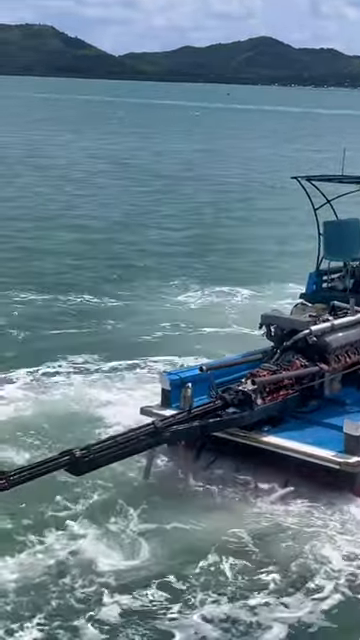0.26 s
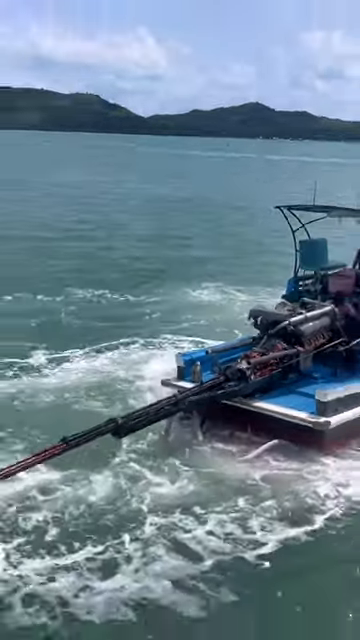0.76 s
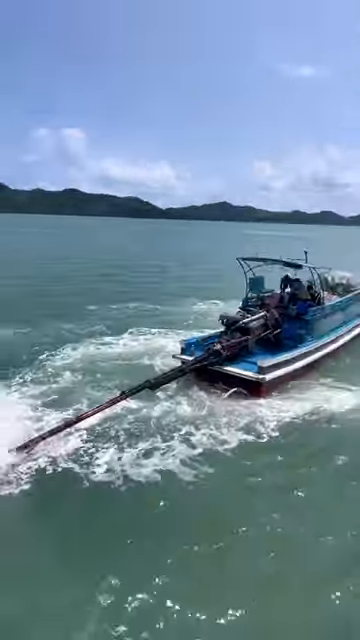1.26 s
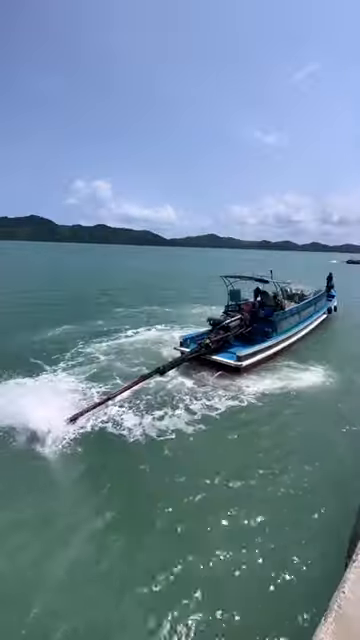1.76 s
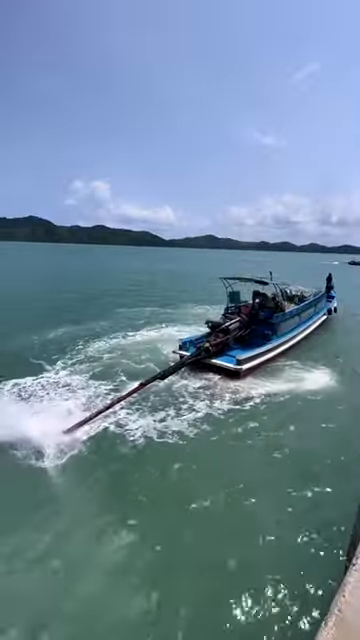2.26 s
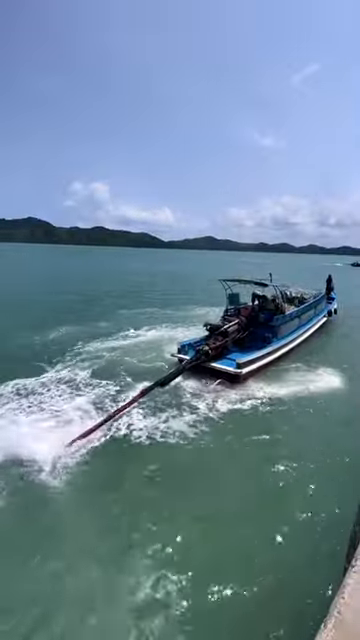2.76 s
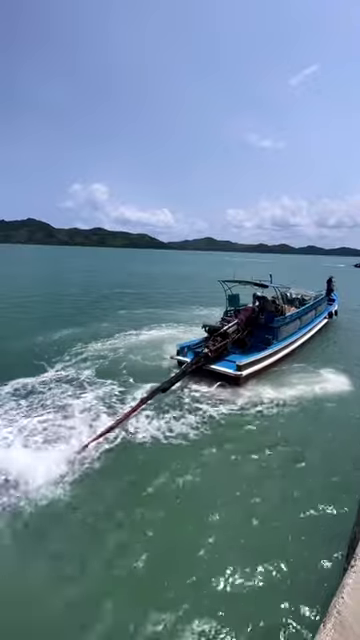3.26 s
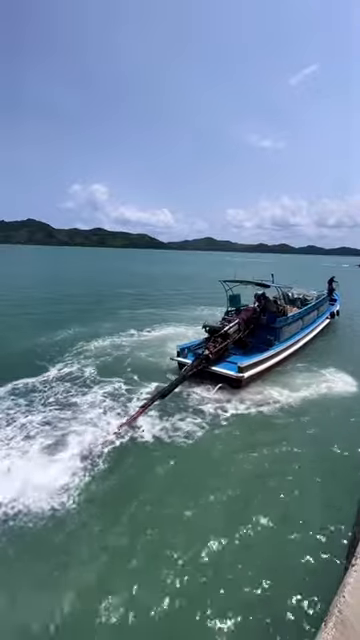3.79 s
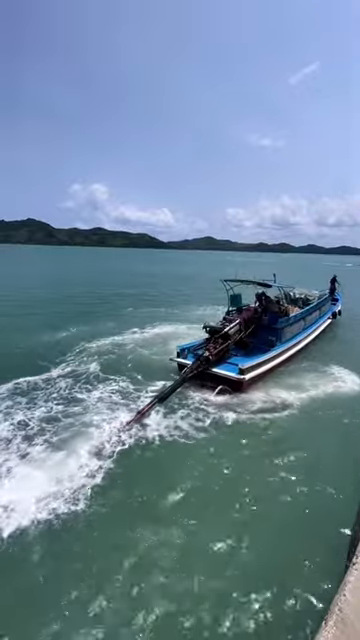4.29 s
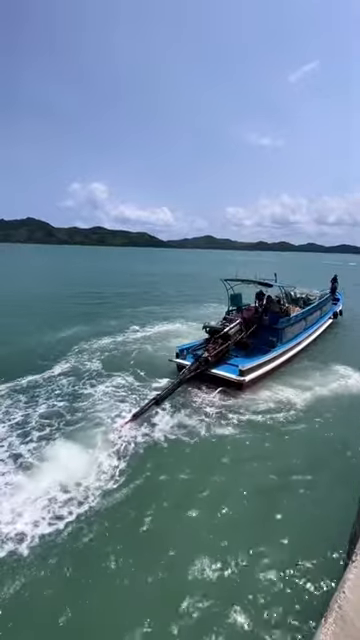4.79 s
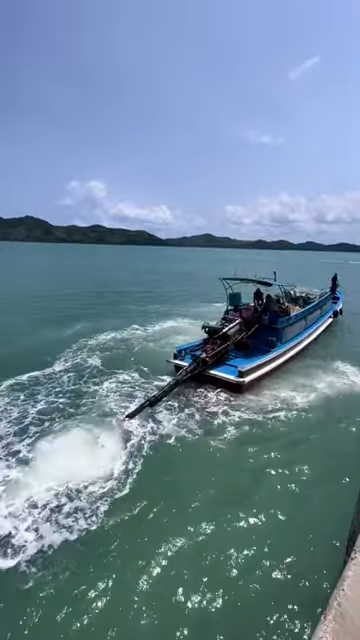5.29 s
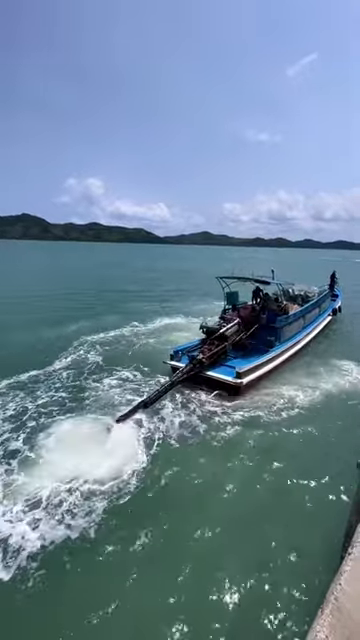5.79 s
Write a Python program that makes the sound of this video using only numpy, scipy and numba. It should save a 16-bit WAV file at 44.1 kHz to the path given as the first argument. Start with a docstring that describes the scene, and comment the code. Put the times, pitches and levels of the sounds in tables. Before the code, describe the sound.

A large diesel with open exhaust drives a wooden boat across open water. It cruises with a rough, uneven growl and metallic clatter, slows to a quieter lumpy idle around three seconds, then revs abruptly with barking exhaust and hard cracks. The propeller digs in with a low thrum, the engine eases, and a second rev climbs to the end. Spray hisses beneath; outdoors, handheld stereo microphone on the shore, no echo.

```python
"""Diesel long-tail boat across water

A big eight-cylinder engine cruises, drops to idle and is revved twice. Uneven firings excite low engine orders
(sines locked to the cycle) and resonant open pipes; gas noise rasps once a firing. Valve gear knocks and cracks
through casing resonances, foam and spray are droplet-modulated noise, and a propeller later digs in and thrums."""
import sys
import numpy as np
from scipy import signal
from scipy.fft import rfft, irfft, next_fast_len
from scipy.io import wavfile
from scipy.ndimage import uniform_filter1d
from numba import njit

SR = 44100
rng = np.random.default_rng(int(sys.argv[2]) if len(sys.argv) > 2 else 0)


def materialize(psi):
    """Save the field psi as 16-bit PCM at rate SR to the path in sys.argv[1].

    A 1-D psi becomes a single channel; in a 2-D psi each row is a channel.
    """
    bounded = np.clip(np.atleast_2d(psi).T, -1, 1)
    quanta = np.round(bounded * 32767).astype(np.int16)
    wavfile.write(sys.argv[1], SR, quanta)


N = 266364
TIME_S = np.arange(N) / SR


def undb(db):
    """Decibel definition: amplitude ratio of a level."""
    return 10 ** (np.asarray(db) / 20)


def unit(x):
    """Normalisation to a root-mean-square of 1."""
    return x / np.sqrt(np.mean(x ** 2))


def curves(table):
    """Linear interpolation of a table's columns over its times, one value a sample."""
    s, *columns = np.transpose(table)
    return [np.interp(TIME_S, s, column) for column in columns]


def glide(start_db, end_db, middle_s):
    """Linear level change lasting 1 s about its middle."""
    return np.interp(TIME_S, [middle_s - .5, middle_s + .5], [start_db, end_db])


def walk(rate):
    """Smoothed random process: levels held 1 / rate s and averaged twice; spread near 1."""
    hold = int(SR / rate)
    steps = np.repeat(rng.standard_normal(N // hold + 1), hold)
    return 1.13 * uniform_filter1d(uniform_filter1d(steps, hold), hold)[:N]


def noise_pair(alike):
    """Partial coherence: left and right noise share the given part as a common centre."""
    mid, side = rng.standard_normal((2, N))
    alike = np.clip(alike, 0, 1)
    return np.sqrt(1 + alike) * mid + np.sqrt(1 - alike) * side * np.array([[1], [-1]])


@njit
def svf(x, hz, width):
    """Second-order resonance: a state-variable band-pass with gain 1 at the centre."""
    y, band, low = np.empty(len(x)), 0., 0.
    g, damping = np.tan(np.pi * hz / SR), width / hz
    for i in range(len(x)):
        v = (band + g * (x[i] - low)) / (1 + g * (g + damping))
        band, low, y[i] = 2 * v - band, low + 2 * g * v, damping * v
    return y


def ring(pair, modes, flicker_db):
    """Modal superposition: steep resonances of a left-right pair, each wavering in level by itself."""
    out = np.zeros((2, N))
    for k, (hz, width, *db) in enumerate(modes):
        waver_db = flicker_db * walk(11)
        for ear in range(2):
            once = svf(pair[ear], 1. * hz, 1.66 * width)
            twice = svf(once, 1. * hz, 1.66 * width)  # a second pass steepens the skirts
            out[ear] += (-1) ** k * undb(db[ear] + waver_db) * twice
    return unit(out)


def narrow_modes(pair, ring_db, sharpness=65):
    """Modal density: many narrow modes, flaring and fading at random, colour the noise."""
    out = pair.copy()
    for hz in 550 * 2 ** (3.2 * (np.arange(36) + rng.random(36)) / 36):
        flare = undb(ring_db + 4.5 * walk(9))
        out += flare * np.array([svf(ear, hz, hz / sharpness) for ear in pair])
    return out


def widen(pair, width_db):
    """Mid-side stereo: trades the centre of a left-right pair against its sides."""
    mid = (pair[0] + pair[1]) / 2 * undb(-width_db / 2)
    side = (pair[0] - pair[1]) / 2 * undb(width_db / 2)
    return np.array([mid + side, mid - side])


def hollow(pair):
    """Band rejection: takes bands out of the centre of a left-right pair for short spells."""
    # spells: start t/s, end t/s, low f/Hz, high f/Hz
    hollows = [(2.906, 3.166, 260, 1026), (2.911, 2.957, 960, 1360), (3.18, 3.406, 1020, 1370),
               (3.286, 3.48, 390, 640), (3.29, 3.334, 640, 780), (3.42, 3.497, 640, 970),
               (3.556, 3.663, 470, 690), (5.454, 5.541, 530, 1390)]
    edge_s = 0.039
    size = next_fast_len(N)
    centre = rfft(pair.mean(axis=0), size)
    hz = np.linspace(0, SR / 2, size // 2 + 1)
    removed = 0
    for start_s, end_s, low_hz, high_hz in hollows:
        gate = np.clip(np.minimum(TIME_S - start_s, end_s - TIME_S) / edge_s + .5, 0, 1)
        removed = removed + gate * irfft(centre * ((hz >= low_hz) & (hz < high_hz)), size)[:N]
    return pair - removed


def drops():
    """Amplitude modulation by dense droplets, each a few ms long, some stronger than the rest."""
    hold = SR // 500  # samples; 500 droplets a second
    spread_db, top_db, share = 4, 11, .7
    size = undb(np.minimum(spread_db * rng.exponential(size=N // hold + 1), top_db))
    return 1 + share * unit(uniform_filter1d(np.repeat(size, hold), hold)[:N])


def wash():
    """Filtered noise: foam fizzes round the hull."""
    # bands: centre f/Hz, width/Hz, relative level left/dB, right/dB
    foam_bands = [(1280, 850, 6.5, 8), (3720, 530, -12, -17), (13000, 1900, -15, -8)]
    return ring(drops() * noise_pair(.6), foam_bands, flicker_db=2) * undb(-53)


def spray(knock, casing_db):
    """Modulated noise: steady hiss of spray, stirred by the engine knocks and following the clatter level."""
    # bands: centre f/Hz, width/Hz, relative level left/dB, right/dB
    spray_bands = [(7080, 1600, 5, 4.5), (9180, 1460, -7.5, -2.5), (12400, 2100, -2.5, -2),
                   (15000, 1100, -11, -21)]
    spray_db = -2 + 1.112 * casing_db
    hiss = (knock + 2.6) * drops() * noise_pair(0.39)
    return ring(hiss, spray_bands, flicker_db=2.0) * undb(spray_db)


def churn(pipe_db):
    """Turbulence through resonances: the propeller sinks deeper and thrums."""
    # resonances: centre f/Hz, width/Hz, relative level left/dB, right/dB
    churn_modes = [(185, 40, 0, 0), (247, 35, 0, 0)]
    digs_in_s, rise_s, below_pipe_db = 4.25, 0.056, -8.5
    sunk = np.clip((TIME_S - digs_in_s) / rise_s, 0, 1)
    return sunk * ring(noise_pair(0.76), churn_modes, flicker_db=2.0) * undb(pipe_db + below_pipe_db)


def knocks(casing_db, cylinder, place, chance_db):
    """Cyclic impulse excitation: each firing starts a decaying knock of the valve gear."""
    # one row: knock level/dB at each of the eight firings of a cycle
    firing_knock_db = np.array([12.5, 10, 8.5, 8.5, 8, 8, 5, 4])
    # clatter levels at which the knocks are all alike, and fully unlike
    even_db, uneven_db = -44, -34
    uneven = np.interp(casing_db, [even_db, uneven_db], [0, 1])
    mean_db = np.mean(firing_knock_db)
    knock_db = mean_db + uneven * (firing_knock_db[cylinder] - mean_db)
    return uniform_filter1d(undb(knock_db + chance_db) * np.exp(-place / 0.9), size=160)


def clatter(knock, casing_db, pan_db):
    """Structure-borne sound: valve-gear knocks excite the block and the casing."""
    # upper resonances: centre f/Hz, width/Hz, relative level left/dB, right/dB
    casing_modes = [(2515, 197, -3.5, -2.5), (3017, 524, -5, -5), (4250, 1120, -12, -10),
                    (5200, 800, -9, -8)]
    # lowest ring of the block: centre f/Hz, width/Hz, relative level left/dB, right/dB
    block_modes = [(1901, 300, 3.4, 0)]
    struck = narrow_modes((knock + 1.5) * drops() * noise_pair(0.78), ring_db=-4.5)
    upper = ring(struck, casing_modes, flicker_db=2.1) * undb(casing_db + 0.11 * pan_db - 1.5)
    # the ring near 1.9 kHz sinks by half a decibel around 4 s
    block_db = glide(-1.5, -2, middle_s=3.97)
    return upper - ring(struck, block_modes, flicker_db=1.5) * undb(casing_db + block_db)


def cracks():
    """Transient excitation: the hardest valve-gear knocks are bright bursts, each ringing at its own pitch."""
    # bursts: onset t/s, level before the common offset/dB, centre f/Hz
    hard_knocks = [(0.6833, -30, 4820), (0.698, -21, 5270), (0.7721, -24, 5150), (1.1398, -35, 3330),
                   (1.354, -24, 5010), (1.4975, -23, 5130), (1.7828, -24.5, 5760), (1.8572, -26, 5080),
                   (3.8137, -23.5, 5120), (0.463, -34, 4500), (3.858, -33, 3050), (3.8691, -13.5, 3140),
                   (3.916, -14, 2980), (3.927, -10.5, 2970), (3.9524, -30, 3150), (4.0193, -21, 3450),
                   (4.0402, -25, 3110), (4.0602, -13.5, 3210), (4.0796, -20, 3590), (4.1032, -19, 3310),
                   (4.156, -18, 3010), (4.183, -17, 3000), (4.193, -15, 3100), (4.2462, -22, 3010),
                   (4.2632, -19, 3000), (4.3211, -23, 3290), (4.4613, -27, 3020), (4.4887, -20.5, 5280),
                   (4.676, -16.5, 3070), (4.7511, -21.5, 3080), (4.8239, -21, 5330), (4.903, -22, 5110),
                   (4.9781, -21.5, 5445), (5.0629, -26, 5540), (5.3273, -24, 5320), (5.4789, -22, 6920),
                   (5.5169, -18.5, 5190), (5.5593, -17, 3430), (5.5797, -15, 6960), (5.648, -11.5, 5380),
                   (5.658, -13, 3090), (5.7139, -20, 5530), (5.716, -12.5, 3600), (5.7333, -8, 3640),
                   (5.7608, -8.5, 4380), (5.7907, -14, 3660), (5.8028, -6.5, 8700), (5.8361, -15, 3040),
                   (5.859, -9, 3740), (5.925, -7, 3440), (5.9643, -9.5, 3270), (5.986, -14, 3320),
                   (6.0117, -10, 5600)]
    # broad bands: centre f/Hz, width/Hz, relative level left/dB, right/dB
    crack_bands = [(2000, 1600, -14, -14), (4900, 5700, -5.5, -1.5), (7940, 4600, 2.5, 3),
                   (12800, 1800, -3, -2)]
    rise_s, fall_s, offset_db, ring_db = .002, .0055, -7.5, -0.5
    bright = ring(noise_pair(.4), crack_bands, flicker_db=1)
    hiss, shape, rung = noise_pair(1.0), np.zeros(N), np.zeros((2, N))
    t = np.arange(int(SR / 20)) / SR
    envelope = (1 - np.exp(-t / rise_s)) * np.exp(-t / fall_s)
    for s, db, hz in hard_knocks:
        i = int(s * SR)
        span = slice(i, i + len(t))
        burst = undb(db + offset_db) * envelope[:N - i]
        shape[span] += burst
        rung[:, span] += burst * unit(np.array([svf(ear[span], 1. * hz, hz / 3) for ear in hiss]))
    return shape * bright + undb(ring_db) * rung


def firings(cycles, scatter_db):
    """Periodic impulse train: a pulse per firing for each bank of four, uneven by cylinder and by chance."""
    # one row: strength/dB of each of the eight firings of a cycle
    cylinder_db = np.array([9, -24, 11, -25, 6.5, 12, -3.5, 8.5])
    count, place = np.divmod(8 * cycles, 1)  # firing number and place within it
    count = count.astype(int)
    cylinder = count % 8
    chance_db = scatter_db * rng.standard_normal(1000)[count]
    pulses = np.diff(count, prepend=count[0]) * undb(cylinder_db[cylinder] + chance_db)
    far_bank = np.isin(cylinder, (1, 2, 4, 7))
    return unit(pulses * ~far_bank), unit(pulses * far_bank), cylinder, place, chance_db


def rasp(gas, bark_db, pan_db):
    """Resonant jet noise: the rasp follows the bark level and sinks over a second."""
    # resonance: centre f/Hz, width/Hz, relative level left/dB, right/dB
    rasp_modes = [(666, 146, 1, 0)]
    rasp_db = 1.298 * bark_db + glide(3.5, -4.5, middle_s=1.96)
    return ring(gas, rasp_modes, flicker_db=3) * undb(rasp_db + .5 * pan_db)


def bark(gas, bark_db, pan_db):
    """Resonant jet noise: gas barks in the upper pipe modes."""
    # resonances: centre f/Hz, width/Hz, relative level left/dB, right/dB
    bark_modes = [(766, 99, -2, 10), (1181, 170, -4.5, -1), (1528, 144, -11.5, 3.5)]
    return ring(gas, bark_modes, flicker_db=1.0) * undb(bark_db + 2.28 * pan_db)


def close_pass(gas):
    """Directivity: the dip between pipe and rasp fills as the pipes swing past, and opens as the boat draws off."""
    # resonances: centre f/Hz, width/Hz, relative level left/dB, right/dB
    close_modes = [(464, 126, 0.0036, 0), (517, 100, 0, 0)]
    peak_db, peak_s, rise_db_per_s, fade_db_per_s = -33, 1.12, 1.5, 27
    past_s = TIME_S - peak_s
    close_db = peak_db - np.maximum(fade_db_per_s * past_s, -rise_db_per_s * past_s)
    return ring(gas, close_modes, flicker_db=2.0) * undb(close_db)


def pipe_note(banks, turbulence, pipe_db, pan_db):
    """Pipe resonance: firing pulses and turbulence ring the open pipes."""
    # resonances: centre f/Hz, width/Hz, relative level left/dB, right/dB
    pipe_modes = [(300, 58, -2, 7.5), (357.2, 46.5, 4, 0), (406.4, 47, -4.5, 1.5)]
    return ring(banks + .45 * turbulence, pipe_modes, flicker_db=3.5) * undb(pipe_db - 0.062 * pan_db)


def growl(banks, pipe_db, pan_db):
    """Low-frequency resonance: pulses and noise growl, following the pipe note less steeply."""
    # resonances: centre f/Hz, width/Hz, relative level left/dB, right/dB
    growl_modes = [(45.8, 15, 10, 13), (89.2, 8.5, 10, 10.5), (134.8, 32, 14, 13.5), (211.5, 58, 8.5, 0)]
    growl_db = -13.5 + 0.64 * pipe_db
    return ring(banks + 1.9 * noise_pair(0.99), growl_modes, flicker_db=2.5) * undb(growl_db + 0.29 * pan_db)


def swells(order):
    """Raised-cosine envelopes: amplitude of one order's booms, each a smooth rise and fall."""
    # booms: middle t/s, length t/s, order, level/dB
    booms = [(0.057, 0.26, 11, -36), (0.643, 0.8, 11, -33.5), (0.702, 0.47, 9, -38.5), (0.84, 0.14, 8, -36),
             (1.78, 0.31, 11, -23), (0.49, 0.63, 25, -39), (0.27, 1, 34, -43), (1.07, 0.2, 23, -36.5),
             (1.32, 0.1, 11, -31), (1.259, 0.15, 12, -40), (1.42, 0.5, 25, -43), (1.56, 1, 14, -42),
             (2.04, 0.26, 27, -37), (3.0, 0.2, 12, -34), (3.38, 0.63, 10, -44), (4.39, 0.1, 25, -20.5),
             (4.387, 0.34, 16, -28), (4.66, 0.22, 13, -29), (5.307, 0.27, 13, -27), (5.5, 0.1, 16, -28),
             (1.923, 0.14, 6, -24), (2.34, 1, 3, -33.5), (2.3, 0.64, 6, -26.5), (2.72, 0.35, 6, -31),
             (2.68, 0.31, 8, -35.5), (2.4, 0.74, 11, -30.5), (2.852, 0.33, 9, -32.5), (2.984, 0.25, 8, -29),
             (3.0, 0.39, 11, -34), (3.06, 0.2, 6, -26.5), (3.44, 0.21, 6, -49), (3.47, 0.88, 8, -43),
             (4.06, 0.31, 8, -18.5), (4.077, 0.42, 5, -25), (4.55, 0.63, 6, -30.5), (4.74, 0.19, 11, -36),
             (5.06, 0.22, 3, -36), (5.323, 0.16, 11, -21.5), (5.6, 0.17, 11, -27.5), (5.609, 0.74, 9, -27),
             (5.66, 0.4, 8, -22.5), (5.7, 0.88, 5, -31), (5.9, 0.16, 6, -23.5), (5.85, 0.17, 14, -34),
             (5.98, 0.22, 3, -27)]
    amplitude = 0
    for middle_s, length_s, k, db in booms:
        if round(k) == order:
            turn = np.clip((TIME_S - middle_s) / (1.62 * length_s), -.5, .5)
            amplitude = amplitude + undb(db) * np.cos(np.pi * turn) ** 2
    return amplitude


def orders(cycles, pan_db, casing_db):
    """Harmonic synthesis: sines follow multiples of the cycle and reach the two ports with unlike phase."""
    # one row: multiples of the cycle rate
    orders_heard = (3, 5, 6, 8, 9, 11, 10, 12, 13, 14, 16, 23, 25, 27, 34)
    # one row: level/dB of each order relative to the clatter level, between its swells
    order_db = [-21, -11.5, -8.5, -37, -21, -9, -7, -9.5, -16, -10, -34, -15.5, -12, -11.5, -22.5]
    # for each order: share of the left-right tilt, phase lead of the left port/rad
    order_side = [(1.3, 0.21), (0.57, 0.3), (0.51, 0.96), (1.7, 0.44), (0.24, 1.4), (-0.46, 0.62),
                  (-0.55, 0.74), (0.59, 0.57), (1.1, 0.58), (-0.24, 0.64), (0.28, 0.66), (0.93, 1.8),
                  (0.47, 2), (0.33, 0.42), (.3, 0.38)]
    out = 0
    for k, db, (tilt, lead) in zip(orders_heard, order_db, order_side):
        phase = 2 * np.pi * (k * cycles + rng.random()) + .4 * walk(12)
        amplitude = np.sqrt(2) * (undb(db + casing_db) + swells(k))
        gain = amplitude * undb(2.8 * walk(12) + tilt * pan_db)
        port_phase = (lead + .7 * walk(6)) * np.array([[.5], [-.5]])
        out = out + gain * np.sin(phase + port_phase)
    return out


def scene():
    """Linear superposition: one engine cycle drives the sources, which add at the left and right ports."""
    # engine load: t/s, then nominal levels of pipe note/dB, gas bark/dB, clatter/dB
    load = [(0.0, -39, -34, -40.5), (0.45, -33, -33, -38), (1.05, -28.5, -30.5, -36.5),
            (1.75, -28, -28.5, -36), (2.4, -26.5, -29, -41), (2.7, -31, -33.5, -42.5),
            (2.9, -38, -47.5, -45), (3.12, -39, -40.5, -45.5), (3.3, -42, -43, -43.5),
            (3.65, -43.5, -38.5, -49), (3.79, -36.5, -31.5, -40), (3.82, -42, -31, -37),
            (3.9, -35.5, -27.5, -34.5), (3.93, -30.5, -23, -31.5), (4.035, -27.5, -20.5, -28),
            (4.065, -30, -19.5, -34), (4.09, -28.5, -17.5, -29.5), (4.2, -21, -18, -26.5),
            (4.3, -24, -26, -34), (4.6, -25, -26, -34.5), (4.95, -25.5, -31.5, -36), (5.3, -24.5, -27, -38),
            (5.48, -27.5, -32, -36), (5.7, -27, -18.5, -27), (5.89, -21.5, -19, -25),
            (6.04, -23, -22.5, -28.5)]
    # engine speed: t/s, cycle rate f/Hz
    speed = [(0.0, 13.16), (0.6, 12.77), (1.2, 14.03), (1.5, 14.16), (1.9, 13.65), (2.15, 12.9),
             (2.6, 11.05), (2.8, 10.7), (3.2, 9.15), (3.5, 8.6), (3.75, 8.35), (4.2, 13.95), (4.33, 14.62),
             (5.1, 12.08), (5.4, 11.5), (5.6, 12.16), (5.75, 13.91), (6.04, 16.55)]
    # stereo image: t/s, left minus right level/dB, width of exhaust/dB, width of low tones/dB
    stereo_image = [(0, 3.5, -9.5, -10), (1, 4.5, -5.5, -7.5), (1.4, 8, -1.5, 1.5), (2, 6.5, 5, 2),
                    (2.6, 5.5, 4.5, 4.5), (2.85, 15, 12, -1.5), (2.97, 1, 20, 10.5), (3.13, 2, 12, 18),
                    (3.25, 6, 12, 11), (3.5, 5.5, 10, -1.5), (3.9, 8, 1, 0.5), (5.2, 6.5, 3.5, 3),
                    (6.04, 9, -1, -4.5)]
    pipe_db, bark_db, casing_db = curves(load)
    tilt_db, width_db, low_width_db = curves(stereo_image)
    pan_db = np.array([tilt_db, -tilt_db]) / 2
    cycles = np.cumsum(curves(speed)[0]) / SR + .99
    near, far, cylinder, place, chance_db = firings(cycles, scatter_db=1.22)

    knock = knocks(casing_db, cylinder, place, chance_db)
    surroundings = wash() + spray(knock, casing_db)
    mechanical = clatter(knock, casing_db, pan_db) + cracks()

    # the two banks exhaust on either side of the hull, so each port hears its own blend
    banks = np.array([near + .5 * far, far + .5 * near])
    puff = undb(chance_db) * (3.0 + np.sin(np.pi * place) ** 2)
    # the further the pipes turn aside, the less alike the gas noise at the two ports
    alike = .6 - .035 * tilt_db
    gas = narrow_modes(banks + 1.5 * puff * noise_pair(alike), ring_db=-5)
    exhaust = rasp(gas, bark_db, pan_db) + bark(gas, bark_db, pan_db) + close_pass(gas)
    exhaust = exhaust + pipe_note(banks, puff * noise_pair(alike), pipe_db, pan_db)
    low = churn(pipe_db) + growl(banks, pipe_db, pan_db) + orders(cycles, pan_db, casing_db)
    return hollow(widen(low, low_width_db) + widen(exhaust, width_db) + mechanical + surroundings)


def record(dry):
    """Saturation and band limiting: the loudest peaks are rounded and both ends of the spectrum cut."""
    rounded = np.tanh(.6 * dry) / .6
    low_cut = signal.butter(2, 38, "high", fs=SR, output="sos")
    high_cut = signal.ellip(10, .2, 80, 15600, fs=SR, output="sos")
    return signal.sosfilt(high_cut, signal.sosfilt(low_cut, rounded))


dry = scene()
out = record(dry)
materialize(out)
```